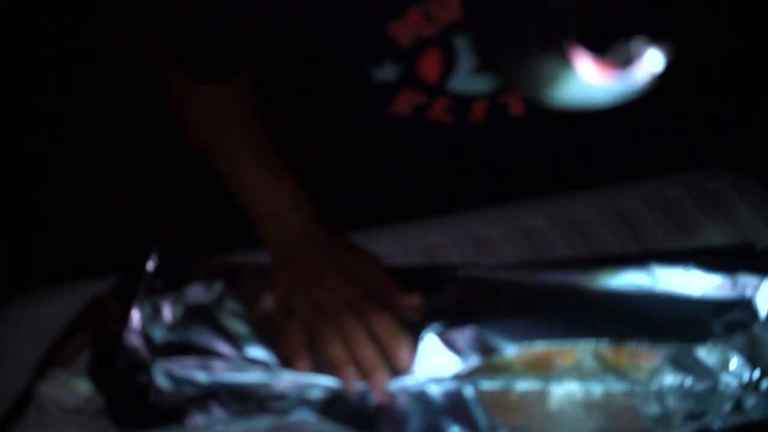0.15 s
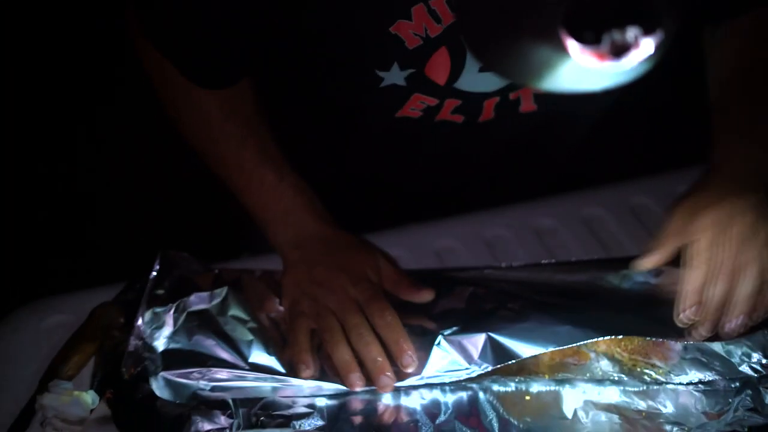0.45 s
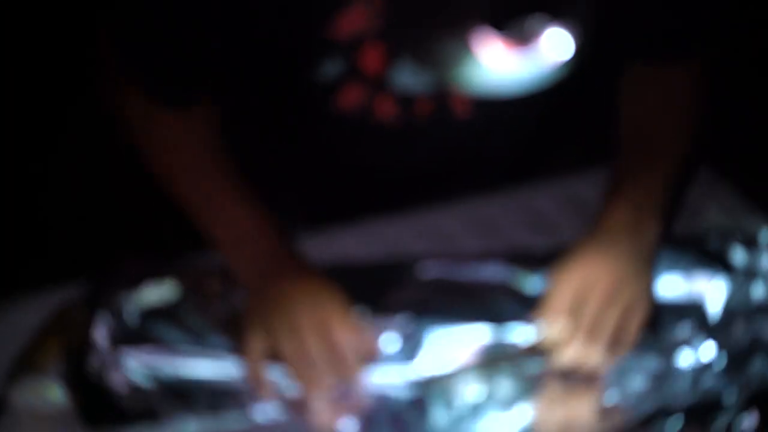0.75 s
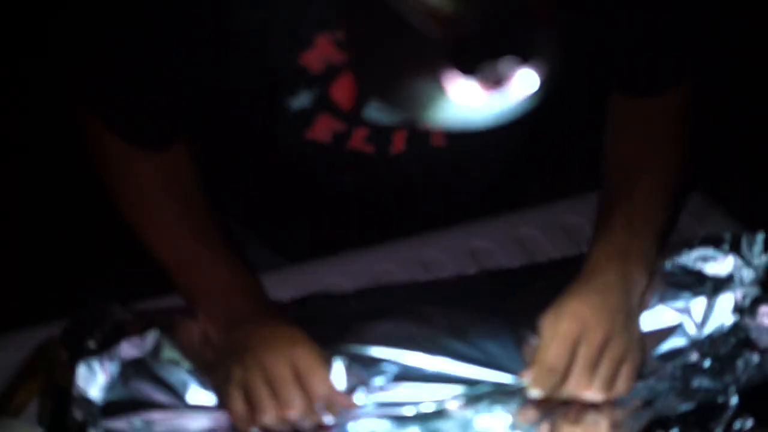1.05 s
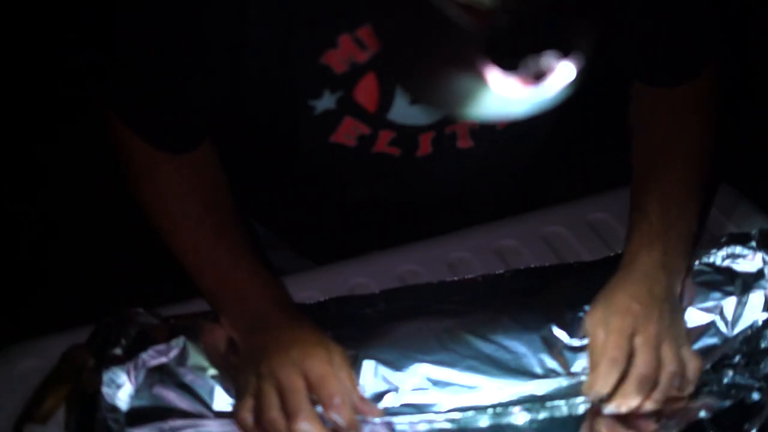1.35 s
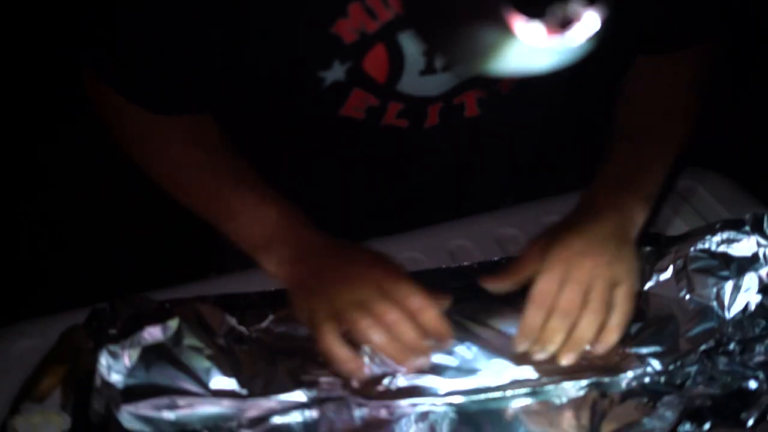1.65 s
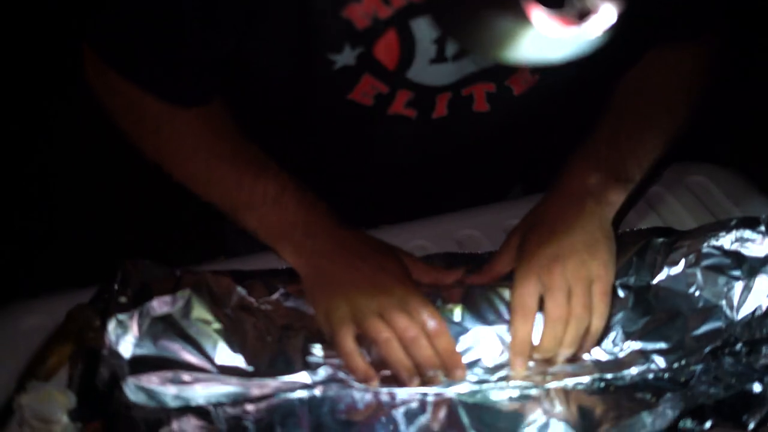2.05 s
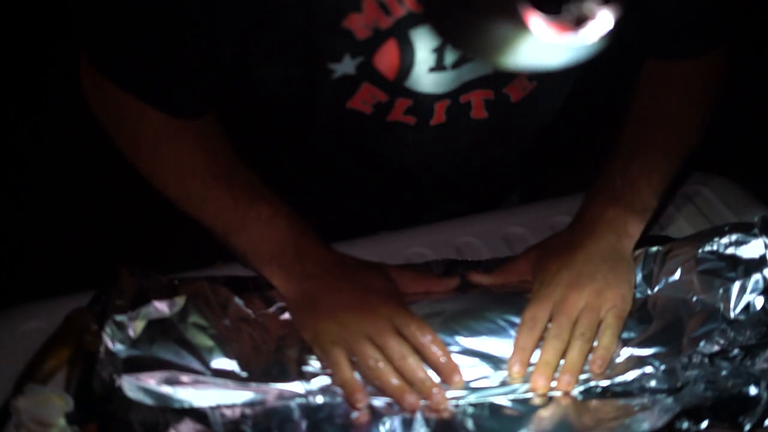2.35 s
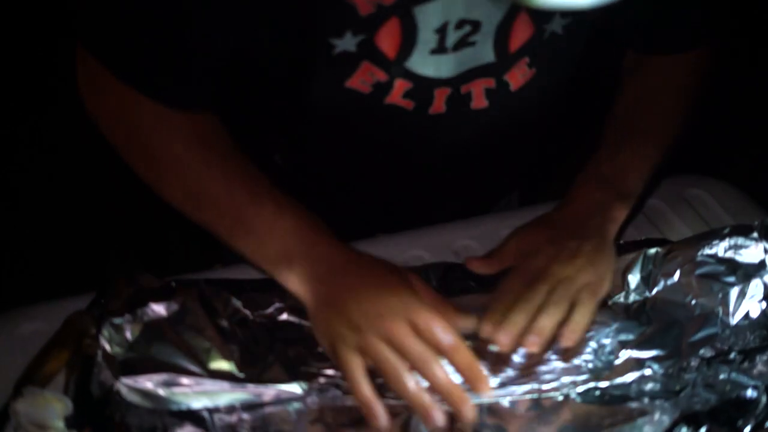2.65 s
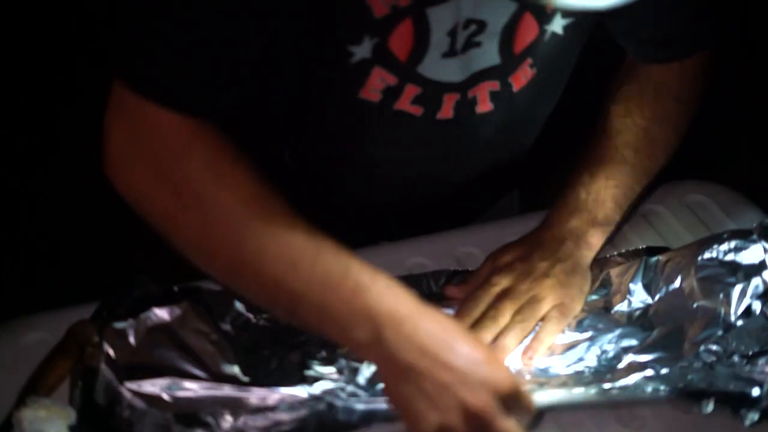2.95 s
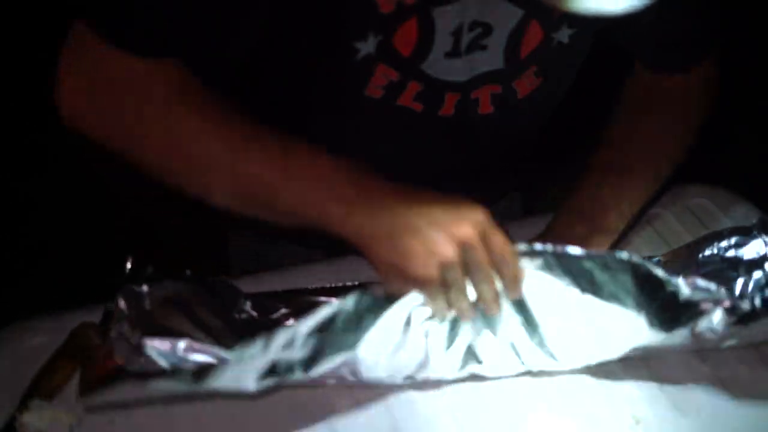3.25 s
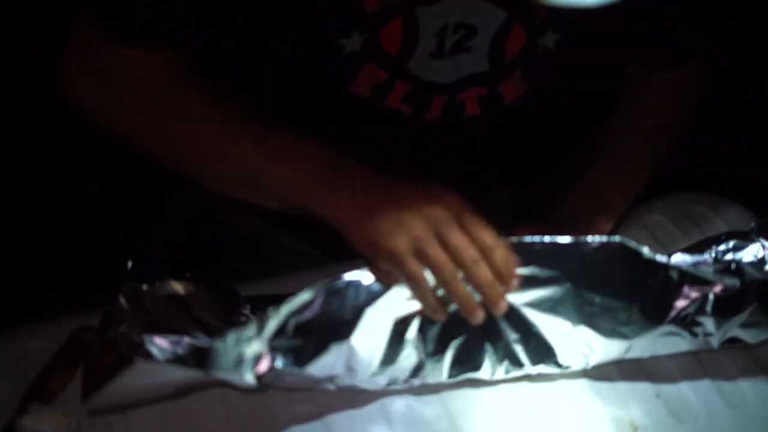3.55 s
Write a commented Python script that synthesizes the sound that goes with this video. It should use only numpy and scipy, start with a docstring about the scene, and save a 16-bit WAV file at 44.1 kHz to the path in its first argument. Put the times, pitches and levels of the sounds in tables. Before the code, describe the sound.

Aluminium foil crinkles close by, bright and crisp. Uneven crackling surges near 0.2 s and 0.6-1.1 s, with brief tinny twangs, then continues with lighter pops. Sharp crunches start at 1.77 and 2.3 s, with a dense fold around 2.1-2.2 s. It thins almost to silence by 2.8 s, then bursts again into busy folding until 3.6 s. Faint finger taps, low rustle and quiet outdoor air lie beneath.

```python
"""Foil crackles close by throughout, as hands fold and crimp a sheet of aluminium around food.
The crackle is swarms of tiny random snaps, denser and louder as the hands press harder; each rings one facet.
Folds give way in short dense runs, single creases pop, and broad facets twang as groups of close sine tones.
The parcel rustles low (slower snaps), finger taps are a noise thud with a hollow note,
and faint, gently wavering noise is the quiet night air outdoors."""
import sys
import numpy as np
from scipy import signal
from scipy.fft import rfft, irfft, next_fast_len
from scipy.io import wavfile
from scipy.ndimage import uniform_filter1d, map_coordinates

SR = 44100
rng = np.random.default_rng(int(sys.argv[2]) if len(sys.argv) > 2 else 0)


def pcm_store(signal):
    """Save signal as 16-bit PCM."""
    levels = np.round(np.clip(np.atleast_2d(signal), -1, 1) * 32767)
    wavfile.write(sys.argv[1], SR, levels.astype(np.int16).T)


N = 163170
T = np.arange(N) / SR  # time of each sample, in seconds

# The levels of air, pops, parcel, fine and broad crackle each have an offset added from the settings below.

# How hard the foil is worked, one list per move of the hands: (t/s, fine crackle level/dB, broad facet level/dB)
HAND_MOVES = [
    [(0.0, -31.5, -32), (0.01, -31, -38.5), (0.108, -23, -26), (0.176, -19, -24.5), (0.288, -33, -35.5),
     (0.302, -29, -30), (0.328, -31.5, -34.5), (0.346, -30.5, -30), (0.446, -40, -45),
     (0.454, -36.5, -40.5), (0.53, -27.5, -33.5), (0.564, -33, -34.5), (0.59, -43, -39)],
    [(0.595, -42, -42), (0.605, -24.5, -31), (0.641, -18, -26), (0.667, -20.5, -31.5),
     (0.687, -30.5, -33.5), (0.713, -23, -32), (0.739, -28, -33.5), (0.777, -21.5, -28.5),
     (0.785, -25.5, -30.5), (0.991, -19, -27.5), (1.069, -31.5, -39), (1.101, -26.5, -35),
     (1.14, -33.5, -34.5)],
    [(1.15, -29.5, -36), (1.24, -25.5, -29), (1.252, -27.5, -33.5), (1.406, -26.5, -36.5),
     (1.452, -23, -31.5), (1.54, -28, -38.5), (1.554, -23.5, -40.5), (1.594, -25, -32), (1.624, -31.5, -43),
     (1.646, -41, -47), (1.662, -32.5, -36.5), (1.7, -33.5, -50), (1.75, -40, -50)],
    [(1.755, -44.5, -55), (1.767, -20.5, -34), (1.805, -17, -29.5), (1.889, -35.5, -42),
     (1.895, -31.5, -37), (1.913, -38, -45), (1.981, -37, -44), (2.003, -22.5, -37.5), (2.039, -34, -40.5),
     (2.049, -29, -37), (2.105, -36.5, -39), (2.221, -24.5, -29.5), (2.285, -30, -40.5)],
    [(2.29, -30.5, -36.5), (2.306, -23, -30), (2.322, -17, -30.5), (2.406, -40, -44), (2.438, -31, -38),
     (2.446, -40.5, -48.5), (2.53, -35, -40.5), (2.546, -39, -52), (2.562, -28.5, -42),
     (2.608, -34.5, -37.5), (2.636, -24.5, -45), (2.68, -42.5, -46), (2.815, -69, -67)],
    [(2.82, -48, -58), (2.834, -22, -43), (2.854, -18, -31), (2.942, -26, -37), (2.962, -25.5, -38),
     (2.972, -22, -34.5), (3.002, -25.5, -33), (3.048, -23, -32.5), (3.072, -27.5, -31.5),
     (3.104, -29.5, -36.5), (3.13, -28.5, -30.5), (3.168, -28, -38), (3.24, -25.5, -32)],
    [(3.25, -29, -34), (3.27, -23.5, -30.5), (3.284, -26.5, -34), (3.386, -28, -34), (3.412, -33.5, -36.5),
     (3.44, -30.5, -40), (3.504, -30.5, -31.5), (3.558, -33, -39.5), (3.568, -39.5, -46), (3.61, -40, -41),
     (3.622, -32.5, -30.5), (3.636, -38, -41), (3.7, -30, -34)],
]
# The parcel shifting under the hands: (t/s, level/dB)
PARCEL_LEVEL = [(0.0, -54), (0.16, -49), (0.31, -56), (0.55, -61), (0.57, -41), (0.6, -61), (0.63, -53),
                (1.49, -56), (1.65, -59), (1.67, -57), (1.69, -61), (1.82, -55), (1.84, -58.5), (2.36, -52),
                (2.43, -61), (2.79, -76), (2.98, -49), (3.7, -51)]
# Where the hands work: (t/s, left minus right/dB)
HAND_PLACE = [(0.0, 0), (0.07, -5.5), (0.74, -1.5), (1.57, -2.5), (1.7, 4.5), (1.75, -2.5), (2.67, -1.5),
              (2.79, 5), (2.81, -0.5), (3.7, -2.0)]
# Creases that pop out singly: (t/s, level/dB, ring against crack/dB)
SINGLE_POPS = [(1.053, -23, 5), (1.417, -27, -9), (1.436, -21, -10), (1.664, -23, -15), (1.894, -29, -5),
               (1.976, -32, 2), (2.001, -26, -4), (2.462, -33, -14), (2.478, -34, -6), (2.505, -26, -6),
               (3.267, -23, -11), (3.329, -24, 4), (3.444, -25, 0)]
# Fingers landing on the parcel: (t/s, f/Hz, level/dB)
FINGER_PATS = [(0.166, 356, -43), (.565, 492, -44), (1.43, 528, -47), (1.664, 580, -48), (2.32, 350, -50),
               (2.975, 520, -55)]
# Broad facets that flip with a brief twang: (t/s, f/Hz, level/dB)
FACET_TWANGS = [(0.345, 1663, -27.5), (.689, 2040, -23), (.796, 2305, -26), (1.224, 2570, -28),
                (1.894, 2340, -45), (3.326, 1870, -24.5)]
# Small avalanches as a fold gives way: (t/s, length/s, level/dB)
FOLD_CRUMPLES = [(0.028, .008, -27), (0.338, 0.01, -22), (0.606, 0.0065, -20), (0.706, .008, -26),
                 (0.769, 0.0073, -19), (1.051, .008, -27.5), (1.101, .01, -30), (1.15, 0.0093, -29),
                 (1.36, 0.011, -29), (1.415, 0.01, -29), (1.46, 0.0066, -23), (1.545, 0.015, -25),
                 (1.764, 0.011, -22), (1.99, 0.012, -31), (2.084, 0.019, -24.5), (2.128, .008, -22),
                 (2.148, 0.0059, -21), (2.173, 0.0067, -23), (2.185, 0.014, -21.5), (2.258, .008, -23.5),
                 (2.3, 0.016, -19.5), (2.562, 0.0067, -29), (2.714, 0.011, -35), (2.967, 0.021, -20),
                 (3.037, 0.022, -18.5), (3.12, 0.022, -22.5), (3.256, 0.019, -21), (3.326, .006, -19.5),
                 (3.377, 0.0067, -22), (3.443, 0.0097, -22), (3.618, 0.012, -29)]

# Colour of the fine creases: (f/Hz, level/dB)
FINE_COLOUR = [(60, -83), (600, -42), (1500, -15), (2500, -7), (3500, -4), (4400, -3), (5400, 1),
               (6300, 1.5), (7200, -0.5), (8200, 0), (9000, -3), (10000, -2), (11000, -4)]
# Colour of the broad facets: (f/Hz, level/dB)
BROAD_COLOUR = [(50, -64), (300, -35), (700, -15), (880, -14), (1130, -3), (1450, -5), (1800, 0),
                (2150, -2.5), (2520, 3), (2800, -4), (3100, 0), (4500, -6), (9000, -24.5)]
# Colour of single pops and of crumples: (f/Hz, level/dB)
POP_COLOUR = [(30, -72), (120, -59), (300, -34), (800, -29), (1300, -11.5), (2500, 0), (6000, 2.5),
              (11000, 0)]
# Colour of the low parcel rustle: (f/Hz, level/dB)
PARCEL_COLOUR = [(25, -48), (60, -30), (160, -21), (230, -9.5), (350, -1.5), (430, -7.5), (520, -1.5),
                 (600, -4), (730, 3.5), (880, -7.5), (1400, -0.5), (4000, -57)]
# Colour of a finger tap's thud: (f/Hz, level/dB)
PAT_COLOUR = [(25, -45), (70, -20), (150, 2), (350, 11), (550, 13), (1400, 20), (4000, -6)]
# Colour of the night air: (f/Hz, level/dB)
AIR_COLOUR = [(20, -30), (45, -17), (70, -10), (130, -4), (170, -5.5), (230, 0.5), (500, 2), (850, -1),
              (1500, 1.5), (3000, -3.5), (6000, -7.5), (11000, -15.5)]
# How alike left and right are: (f/Hz, likeness from 0 to 1)
LEFT_RIGHT_LIKENESS = [(100, 0.97), (280, 0.94), (420, 0.79), (580, 0.87), (850, 0.52), (1200, 0.79),
                       (2200, 0.77), (3200, 0.6), (4500, 0.61), (9000, 0.44)]

# Snap rate at a firm press (before clumping), rise in level that doubles it, table level of a firm press
SNAPS_PER_S, RATE_DOUBLES_DB, FIRM_DB = 2000, 6, -26
SIZE_SPREAD_DB, CLUMP_DB, CLUMPS_PER_S = 5.5, 2.5, 130  # uneven snap sizes and uneven timing
CRACK_T60_S, RING_T60_S, BROAD_T60_S = 0.0014, 0.028, 0.036  # time to fall by 60 dB
RING_DB = 5  # a facet's ring against its first crack
SHEET_T60_S, SHEET_DB = 0.16, -2.5  # the whole sheet shivers on; level against the facet's ring
PARCEL_SNAPS_PER_S, PARCEL_T60_S = 130, 0.053  # the parcel bumps more slowly and rings longer
CRUMPLE_RISE_S, CRUMPLE_T60_S, CRUMPLE_SNAPS_PER_S = 0.0015, 0.036, 2000
TWANG_T60_S, TWANG_WIDTH_HZ = 0.059, 123  # width: farthest a tone may lie from the pitch
PAT_T60_S, PAT_WIDTH_HZ, PAT_THUD_DB = 0.13, 35, 30  # last: thud against note, before the thud is coloured
FINE_DB, BROAD_DB, PARCEL_DB, POP_DB = 2.5, 1.5, 1, 23.5  # added to the table levels
AIR_DB, AIR_WAVER_DB, AIR_WAVERS_PER_S = -49.5, 2, 14
TOP_HZ = 11130  # nothing is heard above this


def amp(db):
    """Turn decibels into a gain."""
    return 10 ** (np.asarray(db) / 20)


def unit(x):
    """Scale a sound to an rms of 1."""
    return x / np.sqrt(np.mean(x ** 2) + 1e-20)


def along(points, hz):
    """Read (f/Hz, value) points at any frequency, on a log axis."""
    f, value = np.transpose(points)
    return np.interp(np.log(hz + 1), np.log(f + 1), value)


def curves(rows):
    """Join table rows with straight lines: one value per sample for each column after the time."""
    s, *columns = np.transpose(rows)
    return [np.interp(T, s, column) for column in columns]


def wobble(rate):
    """A smooth random curve with rate knots a second."""
    knots = rng.standard_normal(4096)
    return map_coordinates(knots, [T * rate], mode="wrap")


def add(track, s, sound):
    """Mix a sound into a track, starting at time s."""
    part = track[:, round(s * SR):][:, :sound.shape[1]]
    part += sound[:, :part.shape[1]]


def coloured(pair, spectrum):
    """Colour two unrelated signals and blend them into left and right of one source."""
    m = 2 * next_fast_len(N // 2 + 8192)
    hz = np.fft.rfftfreq(m, 1 / SR)
    # Folding the cepstrum makes the filter causal: no sound starts before its snap
    cepstrum = irfft(np.log(amp(along(spectrum, hz))))
    cepstrum[1:m // 2] *= 2
    cepstrum[m // 2 + 1:] = 0
    colour = np.exp(rfft(cepstrum))
    # Less likeness means more side signal, which is opposite in left and right
    turn = np.arccos(np.clip(along(LEFT_RIGHT_LIKENESS, hz), 0, 1)) / 2
    mid, side = irfft(rfft(pair, m) * colour * [np.cos(turn), np.sin(turn)])[:, :N]
    return np.array([mid + side, mid - side])


def lean():
    """Left and right gains that follow the hands."""
    pan_db, = curves(HAND_PLACE)
    return amp(np.array([pan_db, -pan_db]) / 2)


def dying(t60):
    """Two dense rings made of fading noise, each of energy 1."""
    t = T[:SR // 10]
    ring = rng.standard_normal((2, len(t))) * np.exp(-np.log(1000) * t / t60)
    return ring / np.linalg.norm(ring, axis=1, keepdims=True)


def ringing(hz, width_hz, t60, count=6):
    """A cluster of close modes (sine tones), struck once and dying away."""
    t = T[:SR // 4]
    modes = hz + width_hz * np.linspace(-1, 1, count) * rng.uniform(0.56, 1, count)
    phases = rng.random((count, 1))  # in turns
    tone = np.sin(2 * np.pi * (modes[:, None] * t + phases)).sum(0)
    shape = amp(-60 * t / t60) * (1 - np.exp(-t / 0.0017))  # quick soft start, then decay
    struck = tone * shape
    return (struck * np.linalg.norm(shape) / np.linalg.norm(struck))[None]


def facet(ring_db, t60):
    """One facet's answer to a snap: a crack, its own ring, and the ring of the whole sheet."""
    ring = dying(t60) + amp(SHEET_DB) * dying(SHEET_T60_S)
    return dying(CRACK_T60_S) + amp(ring_db) * ring


def snap_rate(level_db):
    """A harder press makes more snaps a second."""
    return SNAPS_PER_S * 2 ** ((level_db - FIRM_DB) / RATE_DOUBLES_DB)


def swarm(rate, t60, size=2200, count=4):
    """Random snaps of even mean strength; the count facets they ring change every size samples."""
    clumped = rate * amp(CLUMP_DB * wobble(CLUMPS_PER_S))
    sizes = amp(SIZE_SPREAD_DB * np.clip(rng.standard_normal(N), -2, 2))
    snaps = (rng.random(N) < clumped / SR) * sizes
    # Even out the strength, so that the rate alone does not set the loudness
    power = uniform_filter1d(uniform_filter1d(snaps ** 2, size=600), size=600)
    snaps = snaps / np.sqrt(np.abs(power) + 1e-4)
    owner = rng.integers(count, size=N)  # which facet each snap rings
    track = np.zeros((2, N))
    for i in range(0, N, size):
        for k in range(count):
            own = snaps[i:i + size] * (owner[i:i + size] == k)
            add(track, i / SR, signal.fftconvolve(own[None], facet(RING_DB, t60), axes=1))
    return track


def night_air():
    """A faint outdoor background: coloured noise whose level wavers a little."""
    air = unit(coloured(rng.standard_normal((2, N)), AIR_COLOUR))
    return amp(AIR_DB + AIR_WAVER_DB * wobble(AIR_WAVERS_PER_S)) * air


def pats():
    """Fingers tap the wrapped food: a short thud of noise and a hollow note."""
    thuds, notes = np.zeros((2, 2, N))
    for s, hz, db in FINGER_PATS:
        add(thuds, s, amp(db + PAT_THUD_DB) * dying(t60=0.02))
        add(notes, s, amp(db) * ringing(hz, PAT_WIDTH_HZ, PAT_T60_S))
    return coloured(thuds, PAT_COLOUR) + notes


def twangs():
    """Broad facets buckle, each ringing around its own pitch."""
    track = np.zeros((2, N))
    for s, hz, db in FACET_TWANGS:
        add(track, s, amp(db) * ringing(hz, TWANG_WIDTH_HZ, TWANG_T60_S))
    return track


def pops():
    """A larger crease flips over with one sharp crack; a held crease hardly rings."""
    track = np.zeros((2, N))
    for s, db, ring_db in SINGLE_POPS:
        snap = facet(ring_db, RING_T60_S)
        add(track, s, amp(db + POP_DB) * snap / np.linalg.norm(snap[0]))
    return coloured(track, POP_COLOUR) * lean()


def crumples():
    """A fold gives way: a dense run of snaps that rises almost at once, holds and dies."""
    power = np.zeros(N)
    for s, length, db in FOLD_CRUMPLES:
        rise = np.clip((T - s) / CRUMPLE_RISE_S, 0, 1)
        fall_db = 60 * np.maximum(T - s - length, 0) / CRUMPLE_T60_S
        power += (rise * amp(db - fall_db)) ** 2
    snaps = unit(coloured(swarm(CRUMPLE_SNAPS_PER_S, RING_T60_S), POP_COLOUR))
    return np.sqrt(power) * snaps * lean()


def parcel_rustle():
    """The parcel shifts under the palms: slower, longer-ringing bumps with a low colour."""
    level_db, = curves(PARCEL_LEVEL)
    bumps = unit(coloured(swarm(PARCEL_SNAPS_PER_S, PARCEL_T60_S), PARCEL_COLOUR))
    return amp(level_db + PARCEL_DB) * bumps


def crinkle():
    """The foil buckles under the hands: swarms of snaps in the fine creases and the broad facets."""
    fine_db, broad_db = curves([row for move in HAND_MOVES for row in move])
    fine = unit(coloured(swarm(snap_rate(fine_db), RING_T60_S), FINE_COLOUR))
    fine = amp(fine_db + FINE_DB) * fine
    broad = unit(coloured(swarm(snap_rate(broad_db), BROAD_T60_S), BROAD_COLOUR))
    broad = amp(broad_db + BROAD_DB) * broad
    return fine * lean() + broad * lean() ** 0.63  # the broad facets lean less to one side


def scene():
    """Foil and hands over the night air."""
    return night_air() + pats() + twangs() + pops() + crumples() + parcel_rustle() + crinkle()


def record(dry):
    """Limit the band: the treble fades out over the last 120 Hz below TOP_HZ."""
    m = next_fast_len(N + 8192)
    hz = np.fft.rfftfreq(m, 1 / SR)
    keep = np.clip((TOP_HZ - hz) / 120, 0, 1)
    return irfft(rfft(dry, m) * keep, m)[:, :N]


dry = scene()
out = record(dry)
pcm_store(out)
```